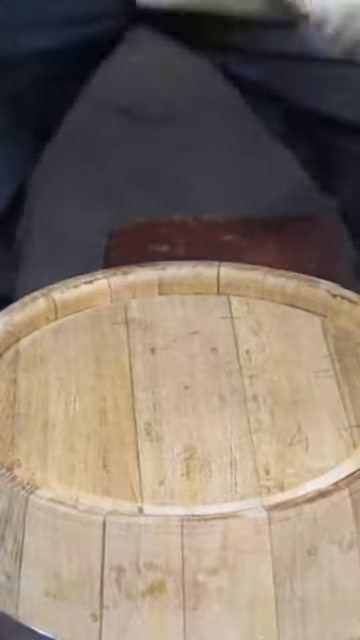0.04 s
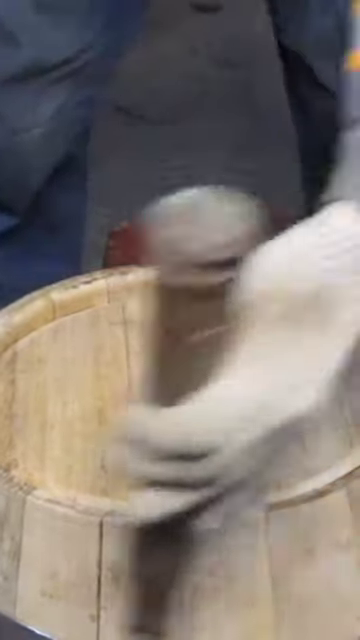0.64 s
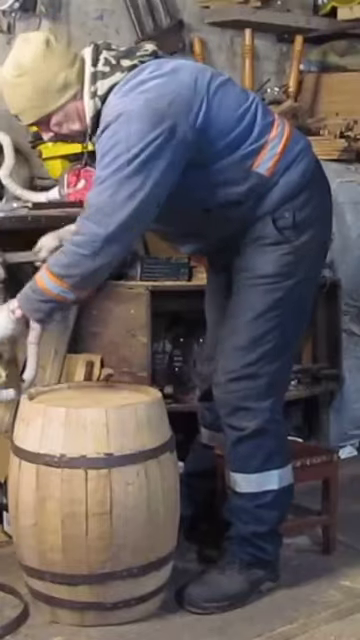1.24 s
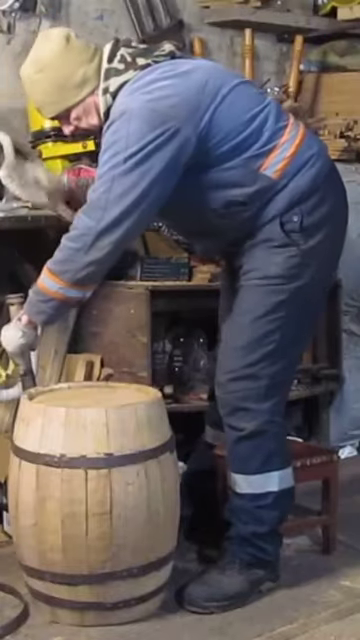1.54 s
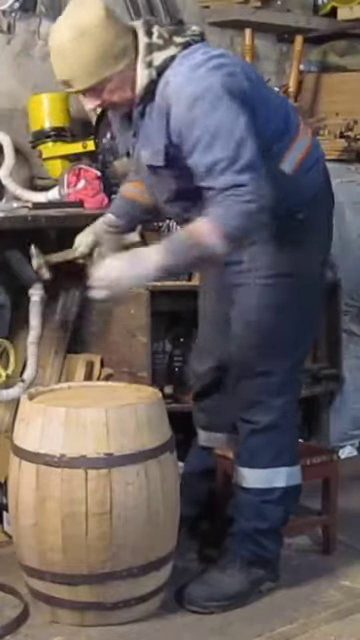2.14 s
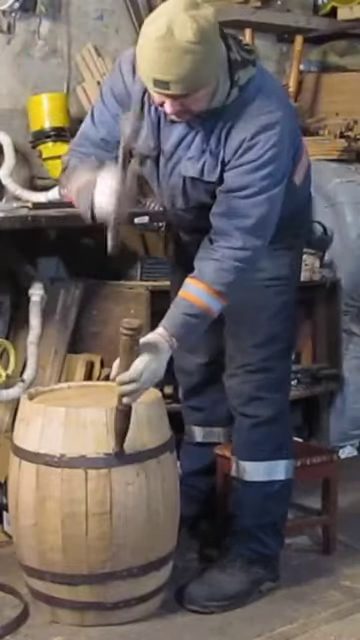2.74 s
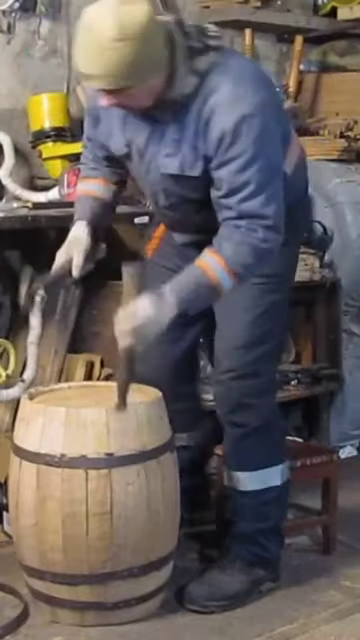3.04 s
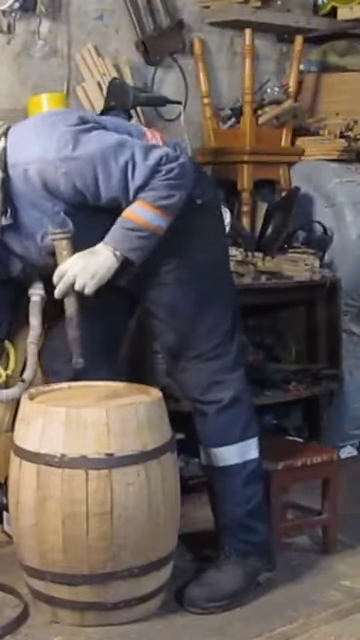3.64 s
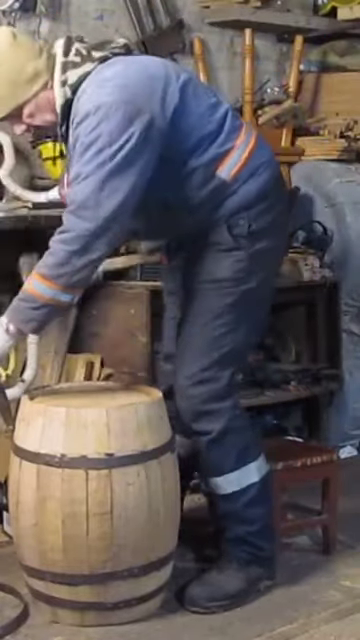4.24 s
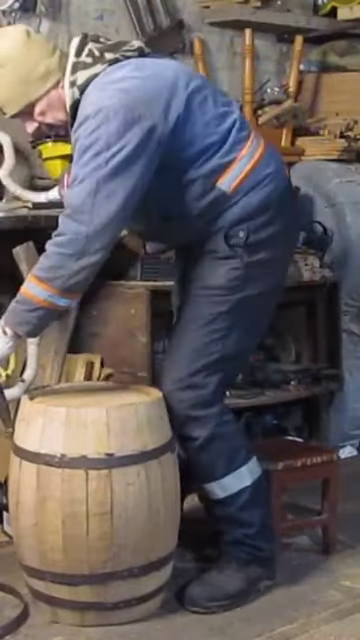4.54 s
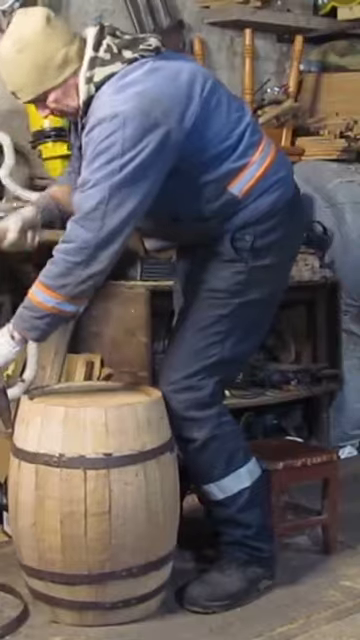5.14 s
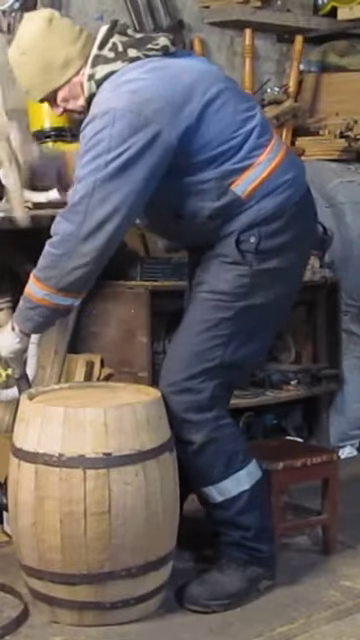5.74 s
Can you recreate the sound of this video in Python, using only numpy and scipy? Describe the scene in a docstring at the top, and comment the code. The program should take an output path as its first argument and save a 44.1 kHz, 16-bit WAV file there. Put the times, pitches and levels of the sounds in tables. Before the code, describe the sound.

Uneven hammer cracks ring through a wooden barrel and its hoops in a small workshop, between soft knocks, a bouncing clink and faint rustling.

```python
"""A hammer drives steel hoops onto an oak barrel in a small, crowded workshop.
The barrel maker sets his driver (a hand tool that passes the blow on) on the hoop with dull knocks,
then strikes it: a crack, and hoop, staves (the barrel's planks) and room ring. Midway he puts down
a steel tool, which clinks and bounces, and drags another up. His boots shuffle and his clothes
rustle, going quiet after each blow."""
import sys
import numpy as np
from scipy import signal
from scipy.fft import rfft, irfft
from scipy.io import wavfile
from scipy.ndimage import uniform_filter1d

SR = 44100
rng = np.random.default_rng(int(sys.argv[2]) if len(sys.argv) > 2 else 0)


def output_pcm(signal):
    """Save a mono or channel-first signal as 16-bit PCM at the path in sys.argv[1].

    Samples are clipped to [-1, 1] before scaling.
    """
    pcm = np.clip(np.atleast_2d(signal).T, -1, 1) * 32767
    wavfile.write(sys.argv[1], SR, np.round(pcm).astype(np.int16))


N = 254898
SIZE = 2 ** 15  # samples in one impact
# times and frequencies of one impact, then of the whole scene
T, F = np.arange(SIZE) / SR, np.fft.rfftfreq(SIZE, 1 / SR) + 1
SCENE_T, SCENE_F = np.arange(N) / SR, np.fft.rfftfreq(N, 1 / SR) + 1

# hammer blows (t60 is the time to fade by 60 dB): t/s, level/dB, crack/dB, crack t60/s, thump/dB,
# treble/dB, hoop f/Hz, hoop boost/dB, stave f/Hz, stave boost/dB, drop in the rustle/dB
BLOWS = [(0.0689, -2.5, -10, .025, 10, 4.5, 1830, 6, 429, 11, 8.5),
         (.749, -6, -6.5, 0.04, 4, -2, 777.5, 8.5, 470, 3, 4.5),
         (0.9584, -3, 7, 0.017, 13.5, -1.5, 1740, 5, 628, 2, 21),
         (1.7291, -2.5, -10, 0.064, -6, -1.5, 1320, 3, 643, 4.5, 26),
         (2.8402, -3, 5.5, 0.05, -11.5, -5, 1730, 2, 677, 10.5, 14),
         (5.0865, -1.5, 9.5, 0.024, 8, -9.5, 1406, 7, 640, -0.5, 27.5)]
# ringing notes of the barrel's staves and ends: f/Hz, level/dB, t60/s
BARREL_NOTES = [(192.4, -12.5, 0.3), (223, -8.5, 0.13), (396, -7.5, 0.05), (440.4, -4, 0.066),
                (544.5, -2.5, 0.31), (608.2, 0, 0.12), (689, -9.5, 0.057), (818, -3.5, 0.089),
                (901, -6, 0.3), (1100, -6.5, 0.14), (1222, -1.5, 0.26), (1350, -2.5, 0.071),
                (1555, -5, 0.18), (1728, -0.5, .18)]
# colour (strength from bass to treble) of its many short-lived notes: f/Hz, level/dB
BARREL_COLOUR = [(40, -31.5), (110, -21.5), (180, -6.5), (280, -6.5), (450, -3), (620, -2), (900, -5),
                 (1300, 0), (2100, 0), (3400, -6), (4700, -9.5), (6000, -15), (9500, -22.5), (13300, -34.5),
                 (15500, -59.5)]


def undb(db):
    """Turn decibels into a gain."""
    return 10 ** (np.asarray(db) / 20)


def along(points, hz):
    """Read between (f/Hz, value) points, with octaves evenly spaced."""
    f, value = np.transpose(points)
    return np.interp(np.log(hz), np.log(f), value)


def fade(t60):
    """Die away by 60 dB in t60 seconds."""
    return np.exp(-np.log(1000) * T / t60)


def swell(s, rise, tail):
    """A loudness curve that grows to its peak at time s and dies away."""
    return np.exp(np.minimum((SCENE_T - s) / rise, (s - SCENE_T) / tail))


def highs(hz):
    """A smooth step from 0 well below hz to 1 well above it."""
    return F ** 2 / (F ** 2 + hz ** 2)


def resonance(hz, db, width):
    """A bell-shaped boost in dB; the width is relative to its centre."""
    return db / (1 + (np.log(F / hz) / width) ** 2)


def tint(x, db):
    """Turn each frequency up or down by db."""
    cepstrum = irfft(np.log(undb(db)))
    # fold the filter so that it rings after a hit, never before
    cepstrum[..., 1:SIZE // 2] *= 2
    cepstrum[..., SIZE // 2 + 1:] = 0
    return irfft(rfft(x) * np.exp(rfft(cepstrum)))


def burst(x, colour):
    """Give a noise burst an overall colour, keeping its fine random peaks."""
    power = uniform_filter1d(abs(rfft(x)) ** 2, size=301)
    return tint(x, along(colour, F) - 10 * np.log10(power + 1e-12))


def add(out, s, x, pan_db=0):
    """Mix a sound in at time s; pan_db is left minus right."""
    i = int(s * SR)
    ear_gains = undb(np.array([[pan_db], [-pan_db]]) / 2)
    out[:, i:i + SIZE] += (x * ear_gains)[:, :N - i]


def hiss(colour):
    """Steady noise of strength (rms) 1, unrelated in the two ears."""
    white = rfft(rng.standard_normal((2, N)))
    noise = irfft(white * undb(along(colour, SCENE_F)), N)
    return noise / noise.std()


def air():
    """The still air of the shop: a faint, low hush."""
    colour = [(20, -16.5), (40, 6.5), (65, -3), (120, -8.5), (500, -8.5), (1400, -8.5), (2300, -14.5),
              (4000, -20.5), (9000, -29), (15000, -44.5)]  # the hush: f/Hz, level/dB
    return undb(-73) * hiss(colour)


def clothes():
    """Cloth rubs and hisses as he moves; he freezes at each blow, then eases back into motion."""
    rub_colour = [(30, -10), (70, -6), (120, -11), (210, -1.5), (320, -5.5), (560, -6.5), (800, -11.5),
                  (1200, -12.5), (2500, -27), (8000, -49)]  # low rubbing: f/Hz, level/dB
    cloth_colour = [(200, -15.5), (1200, 2), (3000, -4), (5000, -8), (7000, -11.5), (11000, -16.5),
                    (15000, -25)]  # hiss of the cloth: f/Hz, level/dB
    still_s, resume_s = 0.29, 0.4
    drop_db = np.zeros(N)
    for s, *_, still_db in BLOWS:
        moving_for = np.maximum(SCENE_T - s - still_s, 0)
        drop_db = np.where(SCENE_T < s, drop_db, still_db * np.exp(-moving_for / resume_s))
    return undb(-drop_db) * (undb(-62.5) * hiss(rub_colour) + undb(-63) * hiss(cloth_colour))


def crack(colour, t60):
    """Two hard things meet: a short, spiky chatter."""
    noise = rng.standard_normal((2, SIZE))
    return burst(noise * abs(noise) * fade(t60), colour)


def wash(colour, rise):
    """Crowded notes and echoes from the shelves blur into noise; the top treble dies first."""
    room_decay = [(60, 0.38), (250, 0.13), (600, 0.26), (1800, 0.24), (4800, .23), (9000, 0.19),
                  (15000, 0.09)]  # how long each band lingers: f/Hz, t60/s
    noise = rfft(rng.standard_normal((2, SIZE)))
    centres, t60s = np.transpose(room_decay)
    tail = 0
    for only_this_band, t60 in zip(np.eye(len(centres)), t60s):
        band = along(np.c_[centres, only_this_band], F)
        tail += irfft(noise * band) * fade(t60)
    return burst(tail * (1 - np.exp(-T / rise)), colour)


def ring(notes, rise, scatter_db, detune, waver):
    """Fading notes; each hit wakes them differently, and echoes make them waver in each ear."""
    out = 0
    knots = np.linspace(0, T[-1], num=64)
    for hz, db, t60 in notes:
        strength, shift = rng.standard_normal(2)
        phase = rng.uniform(0, 2 * np.pi, (2, 1))
        drift = rng.standard_normal((2, 2, len(knots)))
        echoes = np.array([np.interp(T, knots, re + 1j * im) for re, im in drift])
        tone = np.exp(2j * np.pi * hz * (1 + detune * shift) * T + 1j * phase)
        wavering = tone * (1 + waver * echoes)
        out += undb(db + scatter_db * strength) * fade(t60) * wavering.imag
    return out * (1 - np.exp(-T / rise))


def hammer_blows():
    """The hammer hits the driver; the hoop jumps down the staves and the whole barrel rings."""
    crack_colour = [(40, -17), (200, -7), (600, -6), (1400, 4.5), (2300, 2.5), (3500, -6.5), (4600, -2.5),
                    (6000, -10), (10000, -16.5), (13500, -25.5), (16000, -35.5)]  # hammer meeting driver: f/Hz, level/dB
    hoop_notes = [(1160, -59, 0.9), (1570, -50, 0.63), (1800, -55.5, 0.94), (2100, -57.5, .85),
                  (2800, -65, 0.92)]  # the tight hoops sing on faintly: f/Hz, level/dB, t60/s
    out = np.zeros((2, N))
    for s, db, crack_db, t60, thump_db, treble_db, hoop_hz, hoop_db, stave_hz, stave_db, _ in BLOWS:
        body = undb(24) * wash(BARREL_COLOUR, rise=0.0018)
        body += undb(-23) * ring(BARREL_NOTES, rise=0.0043, scatter_db=0.5, detune=0.00057, waver=0.32)
        contact = tint(crack(crack_colour, t60), 22.5 + crack_db + thump_db * (1 - highs(210)))
        # the spot where the driver sits favours some hoop notes and one stave
        spot_db = resonance(hoop_hz, hoop_db, width=0.17) + resonance(stave_hz, stave_db, width=0.15)
        strike = tint(body + contact, spot_db + treble_db * highs(4300))
        singing = undb(3.5) * ring(hoop_notes, rise=0.005, scatter_db=1.5, detune=0.0022, waver=0.22)
        add(out, s, undb(db) * (strike + singing))
    return out


def knocks():
    """Tools set gently on the barrel wake mostly its low notes; steel on the hoop adds a thin tick."""
    # each touch: t/s, level/dB, treble cutoff/Hz, stave f/Hz, stave boost/dB, tick/dB, rise/s
    touches = [(0.241, -21, 930, 440, 13, -16.5, 0.0032), (.426, -46, 3020, 2670, 6, 13.5, 0.0093),
               (0.687, -7, 1387, 865, 10.5, -33, .0015), (1.349, -8.5, 1300, 463, 1, -24.5, 0.01),
               (1.385, -10.5, 742, 627, 12.5, -2.5, 0.0065), (2.442, -.5, 629, 443, 13, -30, 0.0017),
               (2.517, -12, 1100, 191, 9, -16, 0.01), (4.229, -4, 1080, 484, 6.5, -41, 0.0078),
               (4.326, -3.5, 887, 713, 9, -25.5, 0.0059), (4.506, -5, 1114, 601, 4, -18.5, 0.00314),
               (5.426, -9.5, 1450, 514, 8, -31.5, 0.0064), (5.457, -11.5, 1310, 1053, 12, -9.5, 0.0052)]
    out = np.zeros((2, N))
    for s, db, cutoff_hz, stave_hz, stave_db, tick_db, rise in touches:
        body = undb(23) * wash(BARREL_COLOUR, rise)
        body += undb(-24.5) * ring(BARREL_NOTES, rise, scatter_db=-1.5, detune=0.0018, waver=0.25)
        contact = undb(23.5) * crack(BARREL_COLOUR, t60=0.043) * (1 - np.exp(-T / rise))
        push = 1 / (1 + (F / cutoff_hz) ** 3) + undb(tick_db)
        shape_db = db + 20 * np.log10(push) + resonance(stave_hz, stave_db, width=0.15)
        add(out, s, tint(body + contact, shape_db), pan_db=-0.5)
    return out


def boots():
    """Boots shift on the floor with a dull, boxy scuff."""
    steps = [(.41, -55.5), (.583, -53), (.63, -55.5), (3.03, -65), (3.171, -66.5), (3.235, -64),
             (3.39, -69), (4.68, -59)]  # each shift of a foot: t/s, level/dB
    colour = [(60, -22.5), (140, -13), (210, 0.5), (300, -8.5), (600, -15.5), (1500, -27), (6000, -48.5)]  # sole on floor: f/Hz, level/dB
    return sum(undb(db) * swell(s, rise=0.0045, tail=0.099) for s, db in steps) * hiss(colour)


def scuffs():
    """Tool and glove rub in short swells of noise."""
    rubs = [(1.679, -63.5, .06, .04), (2.17, -71, .01, 0.045), (3.08, -64.5, 0.016, 0.03),
            (3.22, -73, 0.016, 0.027), (3.361, -65, 0.061, 0.039), (4.055, -50.5, 0.0095, 0.044),
            (4.087, -37.5, 0.0043, 0.04), (4.121, -39, 0.026, 0.028)]  # each rub: t/s, level/dB, rise/s, tail/s
    colour = [(88, -46.5), (150, -15.5), (601, -15), (918, -2.5), (1050, -15), (1180, 0), (1540, 0.5),
              (1910, -3), (4810, -11.5), (15000, -39)]  # the scraping: f/Hz, level/dB
    return sum(undb(db) * swell(s, rise, tail) for s, db, rise, tail in rubs) * hiss(colour)


def clinks():
    """The steel tool lands, rocks and settles, ringing between the bounces."""
    bounces = [(3.5596, -7.5, -10, 0, 0.0037), (3.580, -6.5, -9.5, -7, 0.0021),
               (3.596, -18, -10.5, -4, 0.012), (3.650, -7, -11.5, -9, 0.0077),
               (3.71, -6.5, -14.5, -44.5, 0.0012), (3.776, -18, -20, 12, .0015),
               (3.855, -17.5, -14, -14, 0.0024)]  # each landing: t/s, ring/dB, clatter/dB, treble/dB, rise/s
    notes = [(1165.4, 2.5, 0.23), (1206, 4, 0.24), (1310, -17.5, 0.078), (2316, -7.5, 0.11),
             (2430, -2.5, 0.072), (2457, 11.5, 0.1), (2500, 2.5, 0.19), (2750, -11, 0.158),
             (2894, -4.5, 0.11), (3026, -10.5, 0.14), (3200, -12, 0.13), (3480, 0, 0.12), (4320, -9.5, .22),
             (4380, -13, 0.18), (6400, -26, 0.4), (6700, -29.5, 0.23), (8600, -31.5, .3),
             (9000, -39.5, 0.5), (9980, -34.5, 0.12), (10200, -26.5, 0.14), (13480, -39, 0.16)]  # the tool's ringing notes: f/Hz, level/dB, t60/s
    colour = [(60, -43), (200, -7), (500, -1), (850, -0.5), (1200, 6.5), (1700, 5), (2500, 10),
              (3600, -0.5), (4600, -7.5), (5600, -16), (9000, -28), (14000, -55.5)]  # its clatter: f/Hz, level/dB
    clusters = [(1132, 7, 0.087), (2500, 7.5, 0.023), (3010, 4.5, .04), (4440, 12.5, 0.047)]  # bunched notes in the clatter: f/Hz, boost/dB, relative width
    out = np.zeros((2, N))
    cluster_db = sum(resonance(hz, db, width) for hz, db, width in clusters)
    for s, ring_db, clatter_db, treble_db, rise in bounces:
        tone = undb(-14.5) * ring(notes, rise, scatter_db=-2.0, detune=0.001, waver=0.4)
        contact = undb(23.5) * crack(colour, t60=0.079) * (1 - np.exp(-T / rise))
        clatter = tint(undb(20) * wash(colour, rise) + contact, cluster_db)
        clink = undb(ring_db) * tone + undb(clatter_db) * clatter
        add(out, s, tint(clink, treble_db * highs(2200)))
    return out


def movement():
    """Clothes, boots and scuffs flutter unevenly in loudness together."""
    knots = np.linspace(0, SCENE_T[-1], num=200)
    flutter_db = 1.6 * np.interp(SCENE_T, knots, rng.standard_normal(len(knots)))
    return undb(flutter_db) * (clothes() + boots() + scuffs())


def scene():
    """All the work over the still air of the shop."""
    return hammer_blows() + knocks() + clinks() + movement() + air()


def record(dry):
    """Two close microphones share the bass; the hardest cracks overload, and the top treble is cut."""
    balance = [(100, -3), (500, -3), (2000, -3), (4500, -1), (10000, 1)]  # the right is louder except up high: f/Hz, left minus right/dB
    dip = (.882, .900, -25)  # the level dips briefly: start/s, end/s, level/dB
    left, right = rfft(dry)
    apart = np.pi / 4 * np.minimum(SCENE_F / 180, 1)  # the sides blend below 180 Hz
    mid, side = (left + right) * np.cos(apart), (left - right) * np.sin(apart)
    pair = np.array([mid + side, mid - side]) / np.sqrt(2)
    lean_db = along(balance, SCENE_F)
    heard = irfft(pair * undb(np.array([lean_db, -lean_db]) / 2), N)
    start, end, dip_db = dip
    in_dip = 1.0 * ((SCENE_T > start) & (SCENE_T < end))
    heard *= undb(dip_db * uniform_filter1d(in_dip, size=150))
    top_cut = signal.ellip(8, 0.2, 70, 15900, fs=SR, output="sos")  # keeps what is below 15900 Hz
    return signal.sosfilt(top_cut, np.tanh(heard))


dry = scene()
out = record(dry)
output_pcm(out)
```